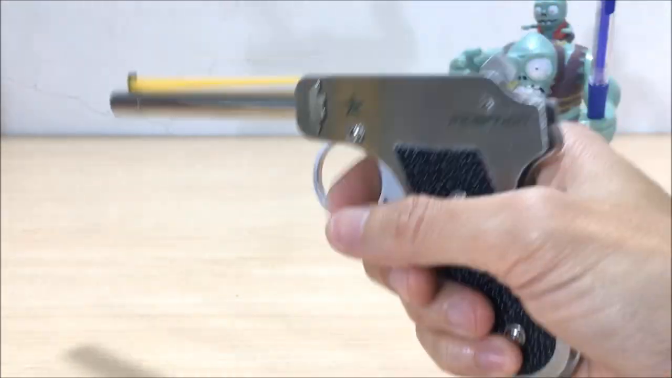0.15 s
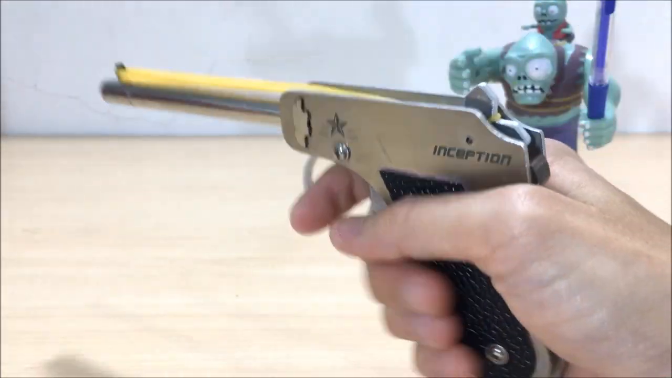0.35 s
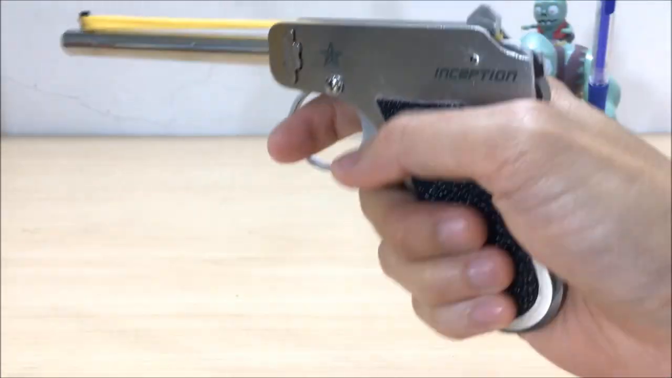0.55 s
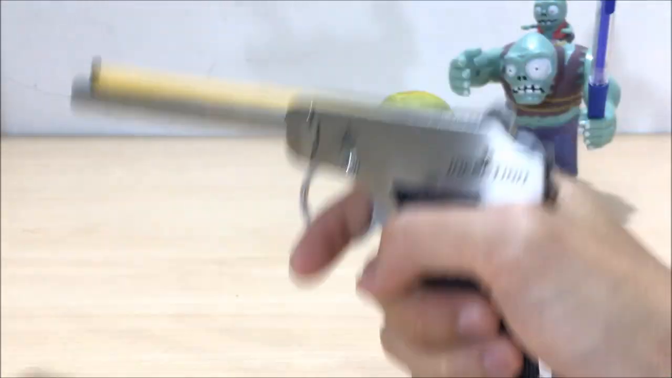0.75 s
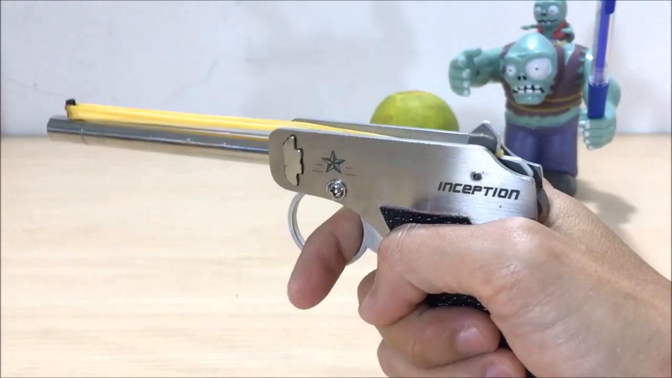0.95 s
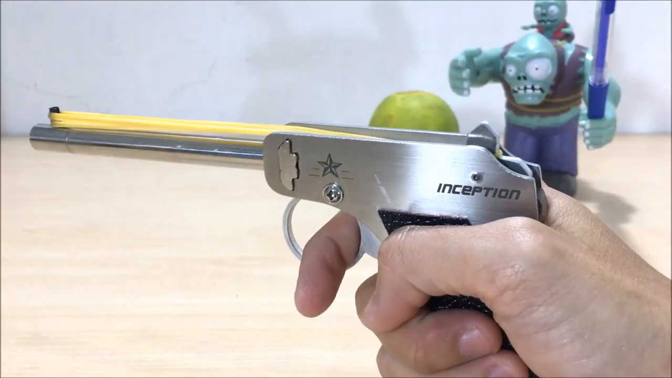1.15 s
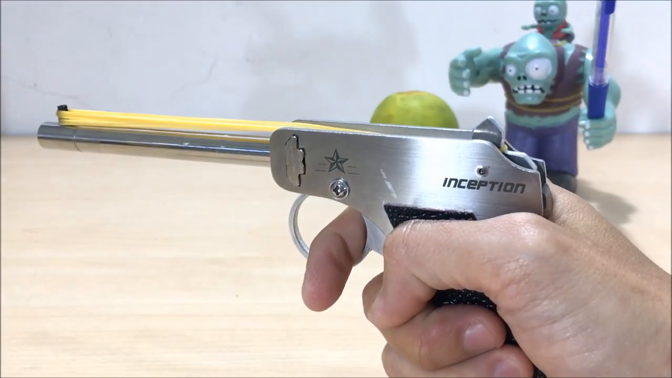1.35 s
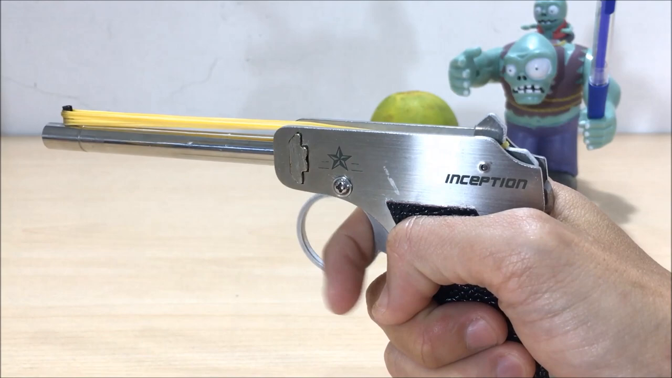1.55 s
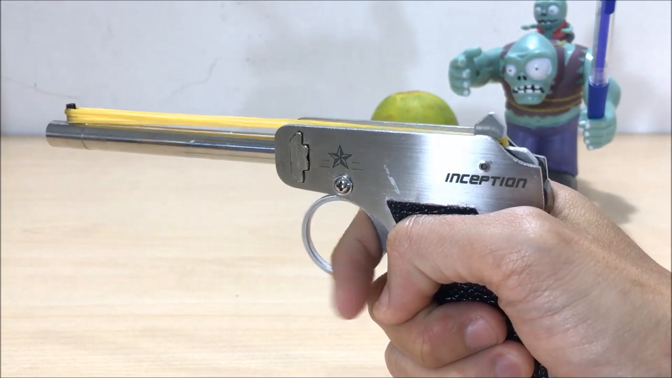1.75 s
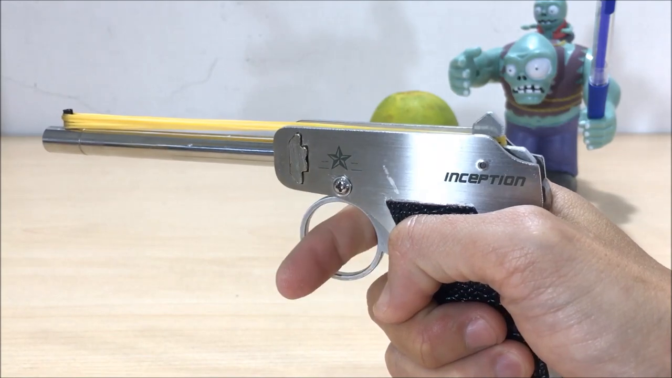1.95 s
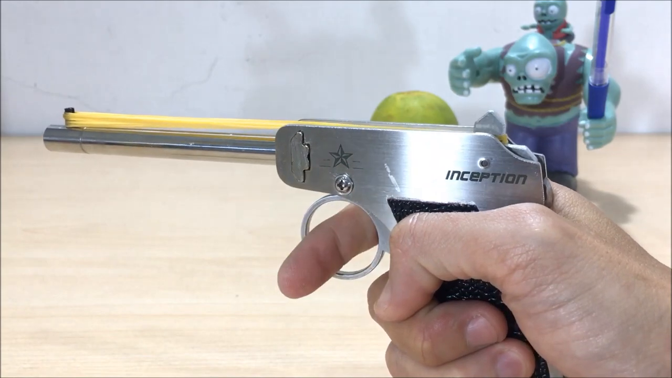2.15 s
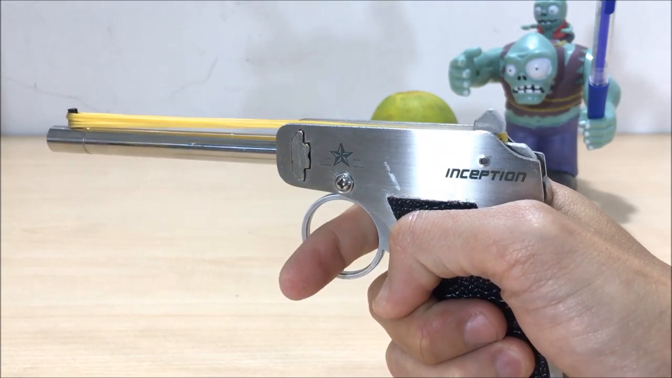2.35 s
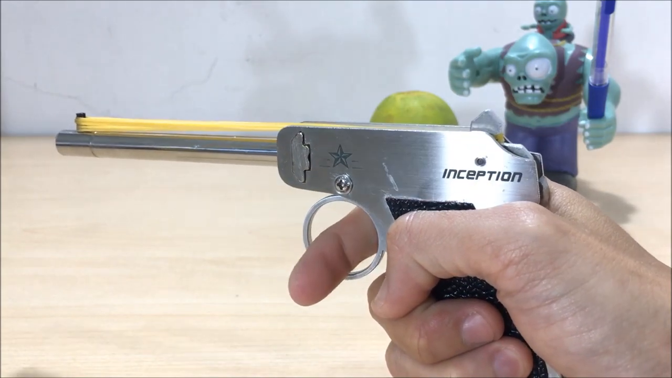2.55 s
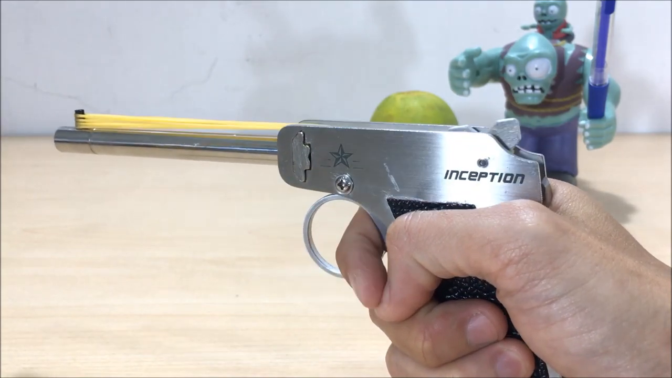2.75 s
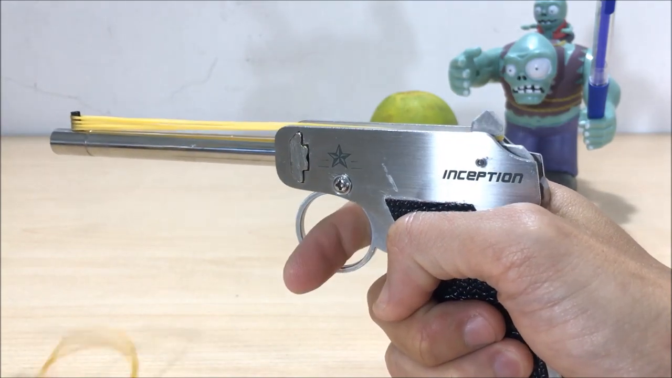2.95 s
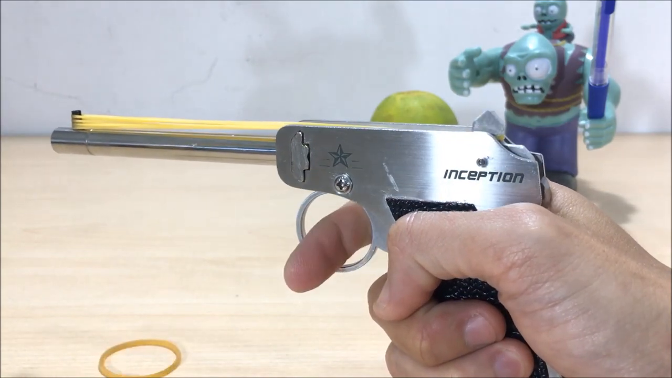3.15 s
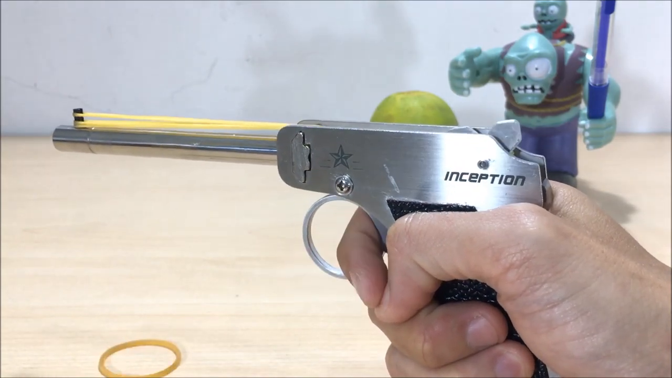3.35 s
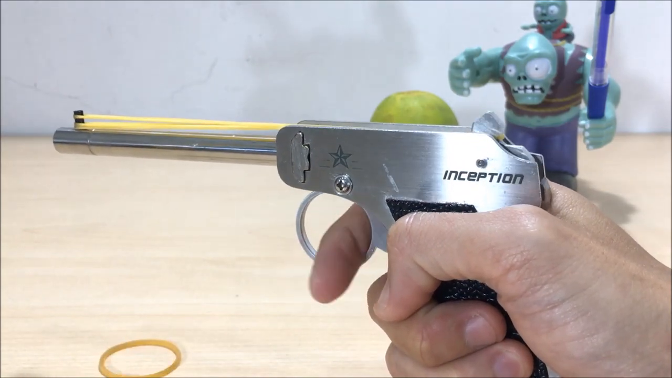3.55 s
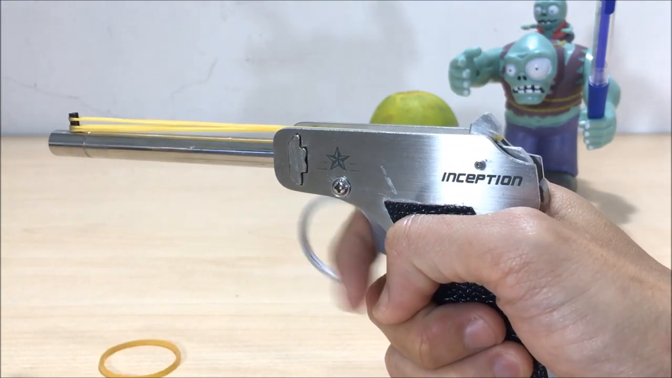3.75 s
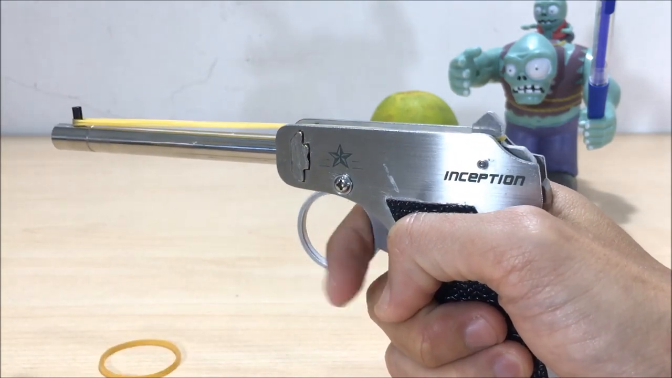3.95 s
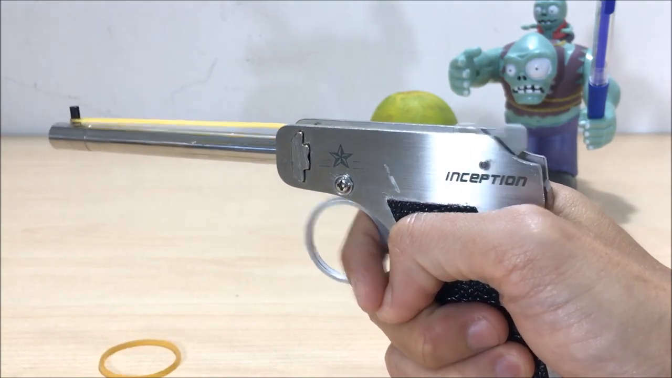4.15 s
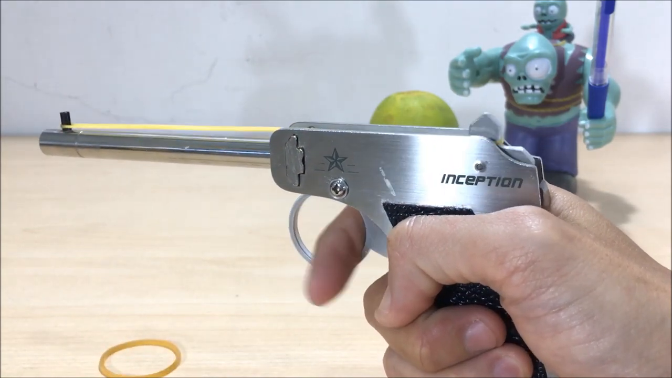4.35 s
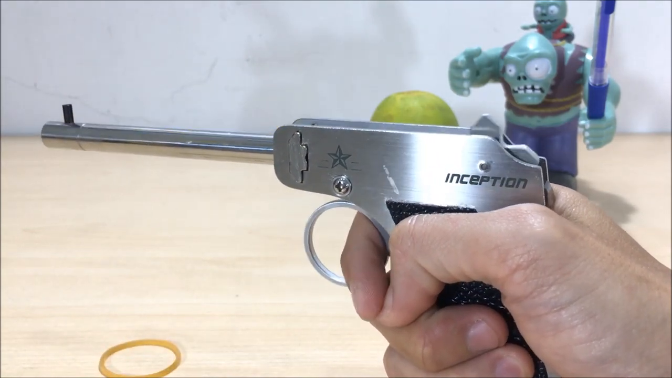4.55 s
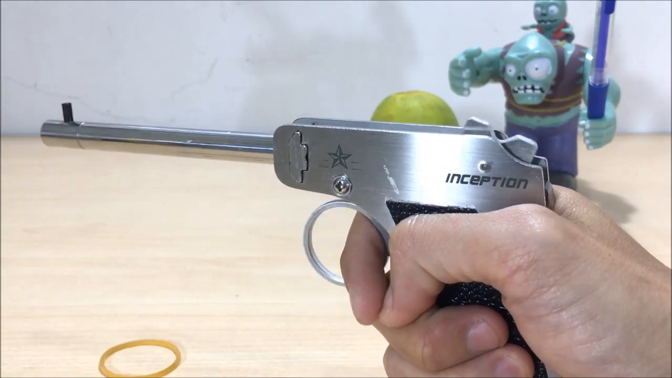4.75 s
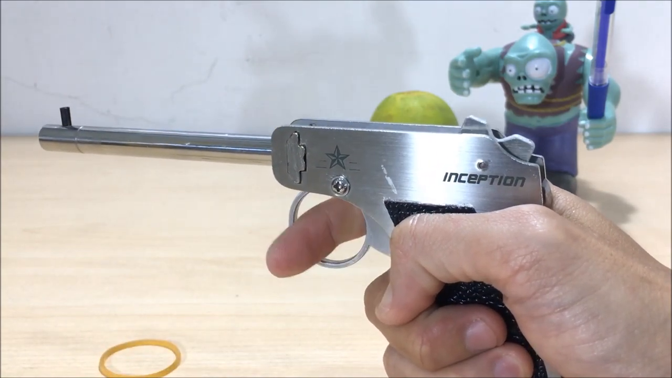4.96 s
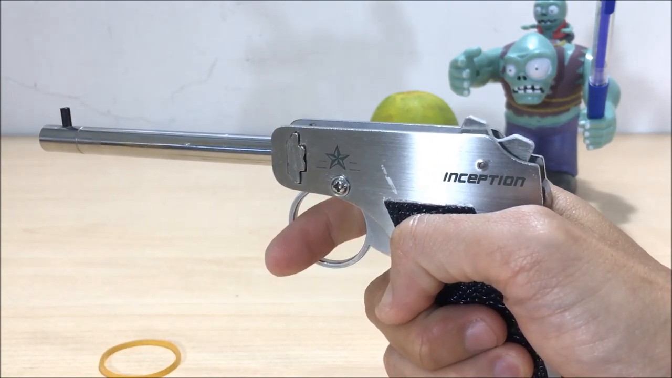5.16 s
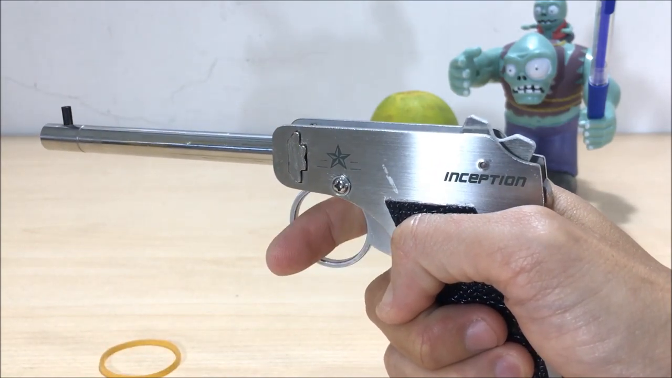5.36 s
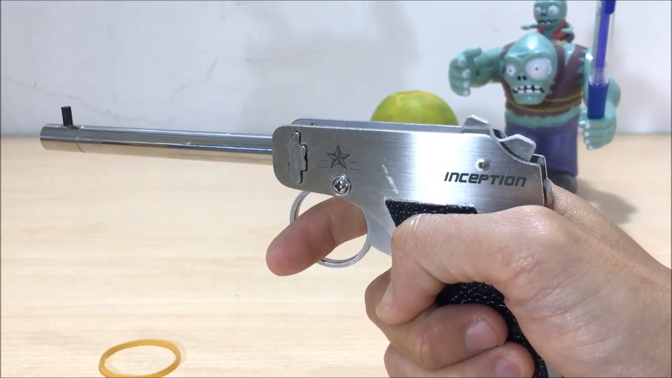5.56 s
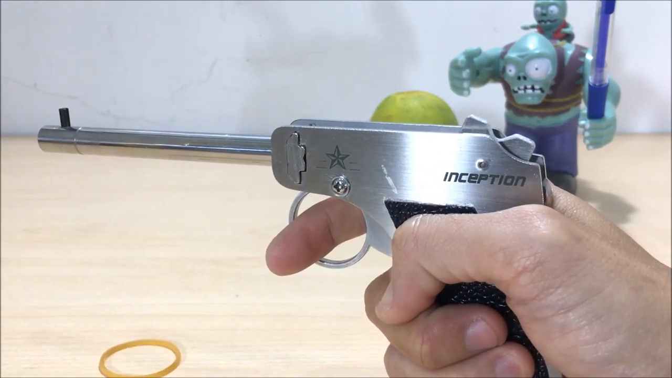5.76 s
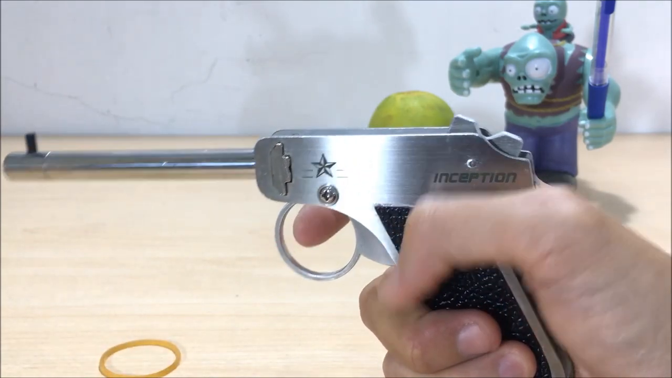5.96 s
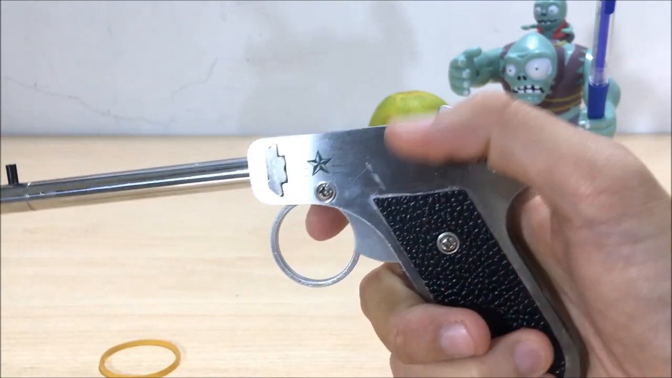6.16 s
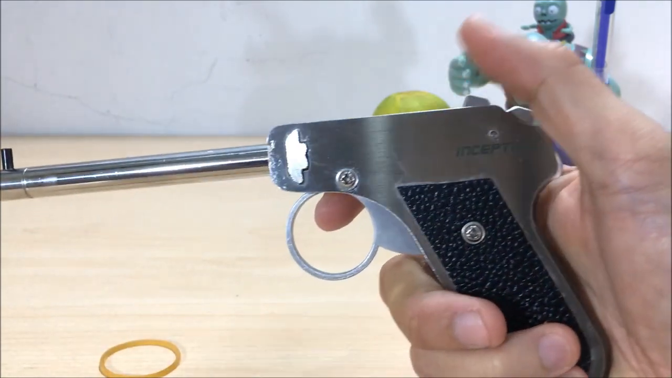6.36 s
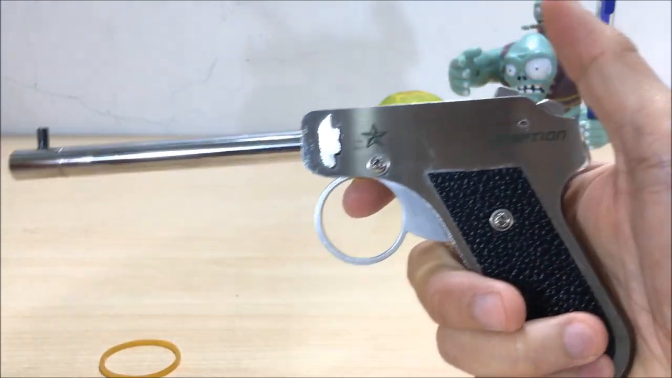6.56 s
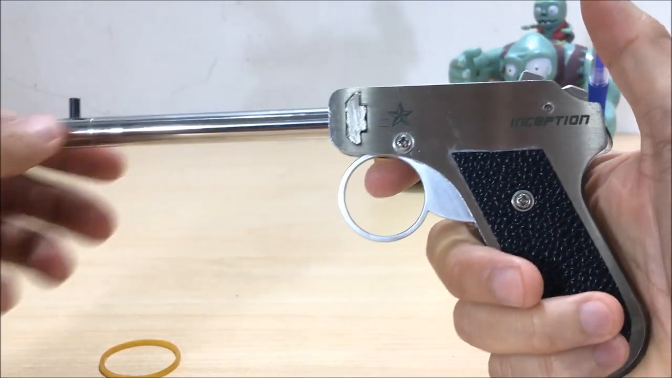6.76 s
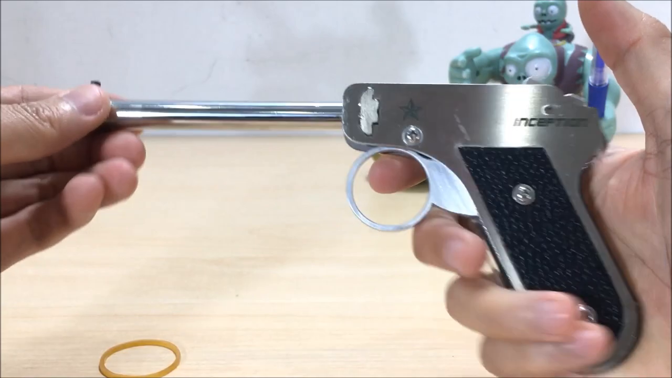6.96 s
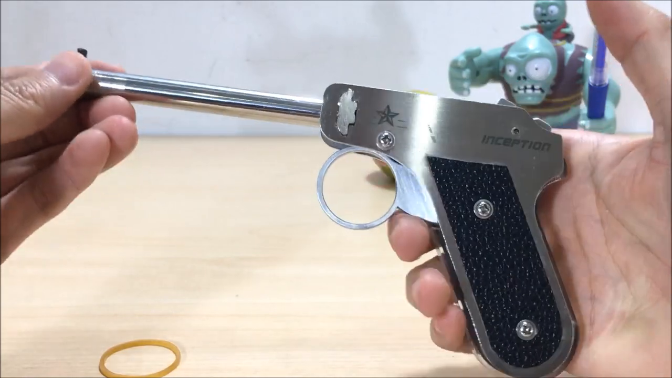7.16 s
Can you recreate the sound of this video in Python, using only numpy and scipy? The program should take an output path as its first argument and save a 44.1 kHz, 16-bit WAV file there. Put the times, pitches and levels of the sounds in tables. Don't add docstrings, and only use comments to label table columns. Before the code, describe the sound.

Over low room rumble, hiss and far insects, a hand faintly rubs a grip. From under two seconds a toy pistol's trigger strikes its steel frame in sharp paired clacks. The second shot is hugest, with a hollow boom and a jolt to the microphone. Shots then quicken, bands cracking and flapping on table and wall. Small ticks and a metal flick end it. Close phone microphone, overloading, small bare room.

```python
import sys
import numpy as np
from scipy import signal
from scipy.io import wavfile
from scipy.ndimage import uniform_filter1d

SR = 44100
rng = np.random.default_rng(int(sys.argv[2]) if len(sys.argv) > 2 else 0)


def to_linear_factor(level_db):
    exponent = np.asarray(level_db, float) / 20
    return 10 ** exponent


def to_wav(sig):
    pcm = np.clip(np.atleast_2d(sig), -1, 1) * 32767
    pcm = np.round(pcm).astype(np.int16)
    wavfile.write(sys.argv[1], SR, pcm.T)


N = 317520

# (frequency [Hz], density [dB per Hz])
HISS_SPECTRUM = [(12, -31.5), (20, 6), (49, -1.5), (74, -13.5), (222, -17.5), (262, -24.5), (301, -18),
                 (434, -20), (472, -21), (513, -23.5), (873, -26), (1090, -30), (2910, -42), (4540, -42),
                 (16000, -66.5)]
HISS_DB, HISS_PATCH_DB = -43.5, 0.87
# (frequency [Hz], width [Hz], level [dB], swell rate [1/s])
INSECTS = [(2010, 30, -83.5, 0.46), (3160, 160, -88, 9.), (4400, 520, -80.5, 14.), (5635, 270, -85, 17),
           (7040, 250, -94, 9.2), (8250, 150, -96.5, 7.)]
# (rate [1/s], lowest [Hz], highest [Hz], length [s], level [dB])
CHIRPS = (16, 3950, 4850, .04, -66)
# (frequency [Hz], t60 [s])
ROOM_DECAY = [(150, .33), (700, .32), (1800, .32), (3500, .36), (5300, .4), (8200, .34), (11000, .31),
              (15000, .29)]
# (delay [s], level [dB])
WALL_ECHOES = [(.0031, -17), (.0065, -19), (0.0129, -21.5)]

# (time [s], peak [dB], centre [Hz], t60 [s])
TICKS = [
    (0.249, -56, 10000, 0.0071),
    (3.848, -32, 6020, 0.022),
    (4.393, -17, 7500, 0.0094),
    (4.6893, -21.5, 7050, 0.0076),
    (4.7243, -30, 6000, .008),
    (5.93, -53.5, 7380, 0.017),
    (6.148, -50, 8800, .0045),
    (6.94, -62.5, 8000, .03),
    (7.013, -44.5, 8000, .006),
]
TICK_WIDTH_RATIO, TICK_ROOM_DB = .55, -12.5
# (time [s], peak [dB], brightness [dB per octave])
SETTLES = [
    (4.8081, -19, -0.5),
    (4.9572, -30.5, 2),
]
# (frequency [Hz], width [Hz], level [dB], t60 [s], room [dB])
TRIGGER_PARTS = [(2220, 770, -14.5, 0.009, -19), (3530, 600, -21, 0.053, -5.5),
                 (5430, 1300, 0.6, 0.0063, -15), (7700, 2000, -6, 0.015, -16)]
# (time [s], peak [dB], brightness [dB per octave])
FLICKS = [
    (7.0545, -18, -0.5),
]
# (frequency [Hz], width [Hz], level [dB], t60 [s], room [dB])
POST_PARTS = [(1510, 650, -19, 0.028, -18.5), (4370, 3000, -12, 0.035, -7.5),
              (6350, 3000, 1.3, 0.018, -15.5), (8000, 2800, -5, 0.015, -15), (9800, 1900, -3, 0.01, -17.5)]
# (middle [s], length [s], level [dB])
RUBS = [(.31, .2, -71), (0.512, 0.19, -68), (0.897, 0.62, -75), (3.29, .25, -58.5), (3.775, .22, -54.5),
        (5.9, .2, -76), (6.5, 0.72, -76.5), (7.021, .25, -81)]
RUB_EDGE_DB = -14.5

# (time [s], blow [dB], room [dB], rebound [dB], brightness [dB per octave])
PULLS = [
    (1.6709, 2.5, -10.5, -10.5, -1.1),
    (2.7299, 4.5, -5, -30, 0.35),
    (3.3770, 0.8, -7, -24.5, -0.1),
    (3.8572, 4, -10, -10, .6),
    (4.2351, 3.5, -11, -21, -0.7),
    (4.5644, 1, -11, -26, -0.44),
]
PULL_RATTLE_S, PULL_SLIP_S, PULL_SLIP_DB = .018, .0043, -17.5
# (time [s], blow [dB], room [dB], brightness [dB per octave], pitch factor [1])
RETURNS = [
    (1.8169, 2.5, -10.5, 0.7, 0.97),
    (2.8878, 1.5, -11, -1.2, 0.97),
    (3.5287, 2, -10.5, 1.1, 0.91),
    (4.02, 0.04, -9.5, 1.3, 1.01),
    (4.4057, 1.8, -13.5, 0.86, 0.95),
]
RETURN_RATTLE_S, RETURN_SLIP_S, RETURN_SLIP_DB, RETURN_REBOUND_DB = 0.016, 0.0025, -17.5, -34
# (frequency [Hz], width [Hz], level on a pull [dB], level on a return [dB])
FRAME_MODES = [(500, 2100, -29, -32), (2600, 650, -17, -15), (3388, 380, -4.5, -8.5),
               (5022, 1300, -2.5, -0.5), (6413, 950, -1.5, 1), (7670, 880, 1.5, 2), (8800, 2400, -3, -2),
               (9742, 680, 1, 1), (12600, 1200, -18.5, -23), (14500, 580, -21, -23.5)]
STRIKE_LEAD_S, REBOUND_S = .01, .0165

# (time [s], level [dB], frequency [Hz], t60 [s])
THUMPS = [(1.6709, -29.5, 250, 0.03), (1.8165, -30.5, 500, 0.032), (2.8877, -29.5, 129.4, 0.049),
          (2.7403, -11, 99.6, 0.092), (3.247, -24, 160, 0.21), (3.4151, -24, 160, 0.36),
          (3.652, -24.5, 129, 0.27), (3.73, -25, 160, 0.4), (3.896, -29, 130, 0.3),
          (4.2807, -18, 281, 0.16), (4.562, -28.5, 180, 0.22)]
THUMP_WIDTH_RATIO = 1.8
# (time [s], level [dB], frequency [Hz], t60 [s], roughness [0-1])
BOOMS = [(2.7406, 14.5, 765, 0.06, .12), (3.249, -22, 740, 0.071, 0.8), (3.4147, -14.5, 343, 0.11, .82),
         (3.653, -16.5, 842, 0.36, 0.2), (3.651, -26.5, 3400, .2, .3), (3.665, -17, 435, 0.042, 1),
         (3.729, -19.5, 690, 0.11, 0.9), (3.897, -18.5, 600, .11, .98), (3.92, -20, 1094, .1, .45),
         (3.43, -22, 1237, 0.17, 0.4), (4.2785, -15, 500, 0.15, 0.94), (4.562, -7, 537, .1, 0.3),
         (4.617, -16, 500, .057, 0.73)]
# (factor on boom frequency [1], level [dB])
BOX_MODES = [(.42, -21), (.8, -14), (.9, -12), (1.0, 5), (1.08, -6), (1.14, -13), (1.42, -12.5),
             (1.75, -11.5), (2.1, -21), (2.6, -22)]
# (time [s], level [dB], length [s])
JOLTS = [
    (2.75, -2.5, 0.018),
    (2.795, -15.5, 0.1),
]
# (time [s], level [dB], centre [Hz], width [Hz], room [dB])
CRACKS = [
    (3.2468, -27.5, 8040, 5020, 0.5),
    (3.4147, -2.5, 2590, 7000, -5.5),
    (3.8971, -2.5, 2800, 5000, -7),
    (4.2792, -0.6, 3600, 8000, -1),
    (4.5859, -6.5, 6800, 4500, -10),
    (4.618, -8, 2780, 5500, -4.5),
]
CRACK_T60_S = .011
# (time [s], level [dB], centre [Hz], t60 [s], room [dB])
FLAPS = [
    (2.75, -1.5, 2930, .12, 2.5),
    (2.751, -10.5, 1303, .1, 5),
    (3.166, -40.5, 2590, .09, 2.5),
    (3.2459, -17, 1700, 0.047, -9),
    (3.65, -23.5, 2900, 0.098, 7),
    (3.65, -34.5, 1500, 0.16, -6.5),
    (3.728, -29, 1400, 0.022, 8.5),
    (4.2787, -5.5, 1103, .03, -5.3),
    (5.145, -45, 3300, 0.039, 1),
]
FLAP_WIDTH_RATIO = 1.15
MIC_TOP_HZ = 15800


def evened(x):
    return x / np.sqrt(np.mean(x ** 2) + 1e-20)


def read(points, hz):
    f, value = np.transpose(points)
    return np.interp(np.log(hz + 1), np.log(f + 1), value)


def add(mix, start_s, sound):
    part = mix[round(start_s * SR):][:len(sound)]
    part += sound[:len(part)]


def resonate(x, hz, width_hz):
    pole = np.exp((2j * hz - width_hz) * np.pi / SR)
    return 2 * signal.lfilter([1 - abs(pole)], [1, -pole], x).real


def dying(t, t60_s):
    return (t >= 0) * to_linear_factor(-60 * np.maximum(t, 0) / max(t60_s, .002))


def chatter(count, spread_db):
    return evened(rng.standard_normal(count) * to_linear_factor(spread_db * rng.exponential(1, count)))


def click(count, at):
    return 1. * (np.arange(count) == at)


def slow(rate_hz):
    t = np.arange(0, N, 256) / SR
    wave = sum(np.sin(2 * np.pi * (f * t + rng.random())) for f in rate_hz * np.geomspace(.15, 1, 16))
    return np.interp(np.arange(N) / SR, t, evened(wave))


def room(start_s):
    taps = np.zeros(SR // 2)
    at = np.arange(0, len(taps) - 6, 6)
    taps[at + rng.integers(0, 6, len(at))] = chatter(len(at), .4)
    hz, t, z = signal.stft(taps, SR, nperseg=256)
    decay = to_linear_factor(-60 * t / read(ROOM_DECAY, hz)[:, None])
    tail = signal.istft(z * decay, SR, nperseg=256)[1]
    build_up = np.clip((np.arange(len(tail)) / SR - start_s) / 0.0099, 0, 1)
    return tail * build_up


def place(mix, start_s, near, colour, room_start_s, room_db):
    tail = signal.fftconvolve(colour, room(room_start_s))
    add(mix[0], start_s, near)
    add(mix[1], start_s, to_linear_factor(room_db) * tail * np.linalg.norm(near) / np.linalg.norm(tail))


def walls(x):
    out = np.zeros(N)
    for delay_s, db in WALL_ECHOES:
        add(out, delay_s, to_linear_factor(db) * x)
    return out


def hiss():
    frames, hz = N // 512 + 5, np.fft.rfftfreq(2048, 1 / SR)
    a, b, patches = rng.standard_normal((frames, 1025, 3)).T
    patches = uniform_filter1d(patches, 20, 0)
    patches = evened(uniform_filter1d(patches, 8, 1))
    z = (a + 1j * b) * to_linear_factor(read(HISS_SPECTRUM, hz)[:, None] + HISS_PATCH_DB * patches)
    noise = signal.istft(z, nperseg=2048, noverlap=1536)[1][:N]
    return to_linear_factor(HISS_DB) * evened(noise)


def insects():
    noise, out = rng.standard_normal(N), np.zeros(N)
    for hz, width_hz, db, rate_hz in INSECTS:
        band = evened(resonate(resonate(noise, hz, width_hz), hz, width_hz))
        swell_db = 5 * np.clip(slow(rate_hz), -2, 2)
        out += band * to_linear_factor(db + swell_db)
    return out


def chirps():
    per_s, low_hz, high_hz, length_s, db = CHIRPS
    out, count = np.zeros(N), 200
    for wait, pitch, size, long in rng.random((count, 4)):
        t = np.arange(0, length_s * (.5 + long), 1 / SR)
        hz = low_hz + pitch * (high_hz - low_hz)
        glide = 1 + (size - long) * t
        tone = np.sin(2 * np.pi * hz * t * glide) * np.hanning(len(t))
        add(out, wait * count / per_s, to_linear_factor(db - 12 * size) * tone)
    return out


def contacts(rows, spread_db, knock, room_start_s):
    out, t = np.zeros((2, N)), np.arange(5000) / SR
    for s, db, hz, width_hz, t60_s, room_db in rows:
        def ring(x):
            for _ in range(3):
                x = resonate(x, hz, width_hz)
            return x

        first = click(len(t), 0)
        hit = ring(chatter(len(t), spread_db) * dying(t, t60_s) + knock * first)
        place(out, s, hit * to_linear_factor(db) / abs(hit).max(), ring(first), room_start_s, room_db)
    return out


def metal():
    rows = [(s, db, hz, TICK_WIDTH_RATIO * hz, t60_s, TICK_ROOM_DB) for s, db, hz, t60_s in TICKS]
    for knocks, parts in [(SETTLES, TRIGGER_PARTS), (FLICKS, POST_PARTS)]:
        for s, db, tilt_db in knocks:
            for hz, width_hz, part_db, t60_s, room_db in parts:
                peak_db = db + part_db + tilt_db * np.log2(hz / 5000)
                rows.append((s, peak_db, hz, width_hz, t60_s, room_db))
    return contacts(rows, 1.2, 0.074, .008)


def rubbing():
    t, strokes = np.arange(N) / SR, np.zeros(N)
    for middle_s, length_s, db in RUBS:
        strokes += to_linear_factor(db + RUB_EDGE_DB * (2 * (t - middle_s) / length_s) ** 2)
    rub = evened(resonate(resonate(chatter(N, 2.6), 6500, 3620), 6500, 3100))
    return rub * strokes * to_linear_factor(1.9 * slow(25))


def frame(column, tilt_db, pitch):
    modes = []
    for row in FRAME_MODES:
        db = row[column] + tilt_db * np.log2(row[0] / 5000)
        modes.append((row[0] * pitch, row[1], db))
    return modes


def strike(mix, s, modes, blow_db, rebound_db, rattle_s, slip_s, slip_db, room_db):
    t = np.arange(2600) / SR - STRIKE_LEAD_S
    slip = to_linear_factor(slip_db) * (t > -slip_s) * (t < 0) * (1 + .5 * t / slip_s)
    blow = to_linear_factor(blow_db) * dying(t, rattle_s)
    rebound = to_linear_factor(rebound_db) * dying(t - REBOUND_S, 0.0036)
    knocks = chatter(len(t), 1.5)

    def ring(x):
        out = 0
        for k, (hz, width_hz, db) in enumerate(modes):
            out = out + (-1) ** k * to_linear_factor(db) * resonate(x, hz, width_hz)
        return out

    near = ring(knocks * (slip + blow + rebound)) / np.std(ring(knocks))
    seating = click(len(t), round(STRIKE_LEAD_S * SR)) + .07 * knocks * dying(t, .01)
    place(mix, s - STRIKE_LEAD_S, near, ring(seating), .009, room_db)


def trigger():
    out = np.zeros((2, N))
    for s, blow_db, room_db, rebound_db, tilt_db in PULLS:
        strike(out, s, frame(2, tilt_db, 1), blow_db, rebound_db,
               PULL_RATTLE_S, PULL_SLIP_S, PULL_SLIP_DB, room_db)
    for s, blow_db, room_db, tilt_db, pitch in RETURNS:
        strike(out, s, frame(3, tilt_db, pitch), blow_db, RETURN_REBOUND_DB,
               RETURN_RATTLE_S, RETURN_SLIP_S, RETURN_SLIP_DB, room_db)
    return out


def thumps():
    out, t = np.zeros(N), np.arange(12000) / SR
    for s, db, hz, t60_s in THUMPS:
        width_hz = THUMP_WIDTH_RATIO * hz
        shudder = rng.standard_normal(len(t)) * dying(t, t60_s)
        thump = resonate(resonate(shudder, hz, width_hz), hz, width_hz)
        add(out, s, to_linear_factor(db) * thump / abs(thump).max())
    return out


def booms():
    out, t = np.zeros((2, N)), np.arange(12000) / SR
    for s, db, hz, t60_s, rough in BOOMS:
        detune = 1 + 0.028 * rng.standard_normal(len(BOX_MODES))
        rough = np.clip(rough, 0, 1)
        width_ratio = 0.094 + 0.2 * rough ** 2

        def body(x):
            modes = sum(to_linear_factor(g) * resonate(x, hz * k, width_ratio * hz * k) for k, g in BOX_MODES)
            return resonate(modes, hz, 2500)

        clean = np.zeros(len(t))
        for (k, mode_db), d in zip(BOX_MODES, detune):
            clean += to_linear_factor(mode_db) * np.sin(2 * np.pi * hz * k * d * t) * dying(t, t60_s)
        shaken = body(rng.standard_normal(len(t)) * dying(t, t60_s) * np.minimum(t / 0.0011, 1))
        boom = (1 - rough) * clean / abs(clean).max() + rough * shaken / abs(shaken).max()
        place(out, s, to_linear_factor(db) * boom, body(click(len(t), 0)), 0.0056, -3.5)
    return out


def rubber():
    cracks = [(s, db, hz, width_hz, CRACK_T60_S, room_db) for s, db, hz, width_hz, room_db in CRACKS]
    flaps = [(s, db, hz, FLAP_WIDTH_RATIO * hz, t60_s, room_db) for s, db, hz, t60_s, room_db in FLAPS]
    return contacts(cracks + flaps, 2.2, 7.9, 0.004)


def jolt():
    out = np.zeros(N)
    for s, db, length_s in JOLTS:
        u = np.arange(SR) / SR / length_s
        add(out, s, to_linear_factor(db) * np.e * u * (1 - u) * np.exp(-u * 2))
    return out


def scene():
    near, wet = metal() + trigger() + booms() + rubber()
    background = hiss() + insects() + chirps() + rubbing()
    return (near + walls(near) + wet + thumps() + jolt() + background)[None]


def top_cut(x):
    return signal.sosfilt(signal.butter(12, 16380, fs=SR, output="sos"), x)


def record(dry):
    heard = dry + to_linear_factor(-84.5) * rng.standard_normal(dry.shape)
    mic_edge = signal.cheby2(12, 50, MIC_TOP_HZ * 1.04, fs=SR, output="sos")
    heard = signal.sosfilt(mic_edge, heard)
    clipped = np.clip(heard, -.95, .95)
    roll_off = signal.cheby2(8, 30, 16800, fs=SR, output="sos")
    return top_cut(signal.sosfilt(roll_off, clipped))


dry = scene()
out = record(dry)
to_wav(out)
```